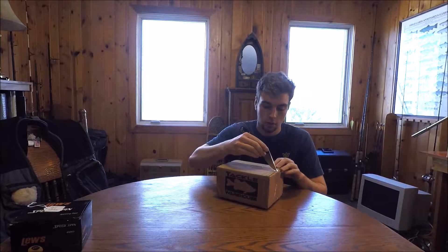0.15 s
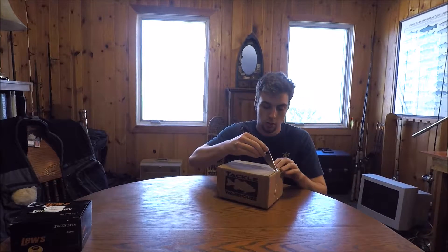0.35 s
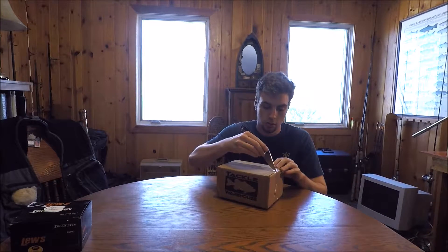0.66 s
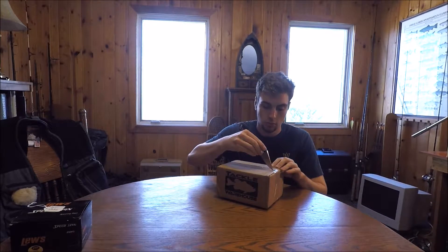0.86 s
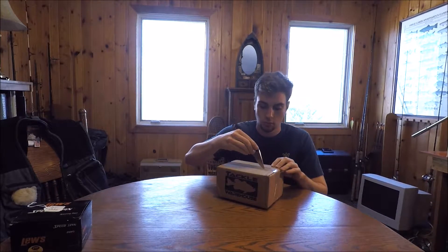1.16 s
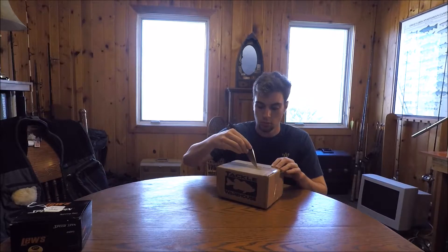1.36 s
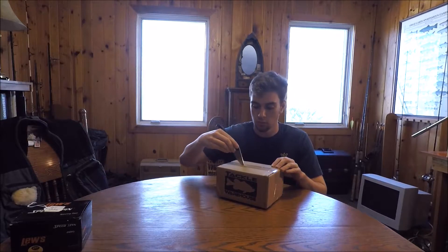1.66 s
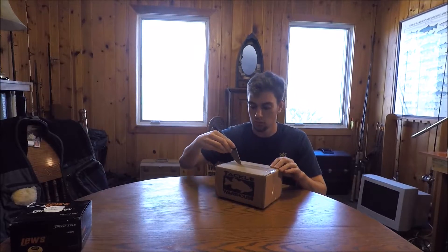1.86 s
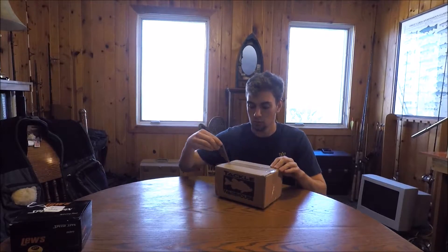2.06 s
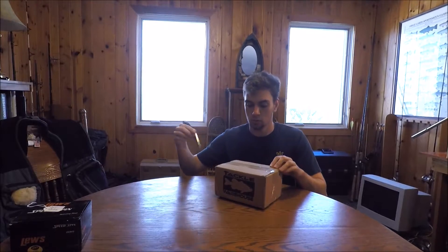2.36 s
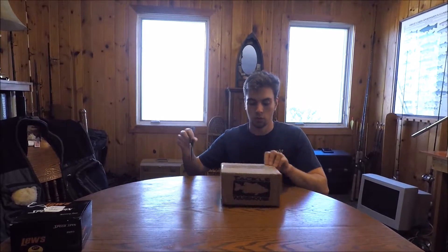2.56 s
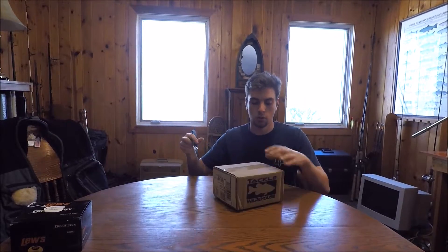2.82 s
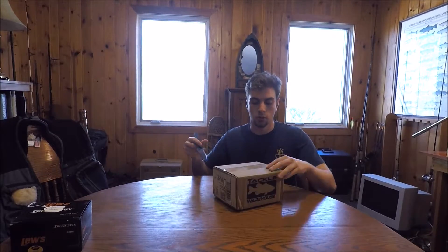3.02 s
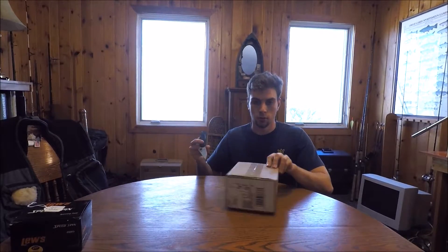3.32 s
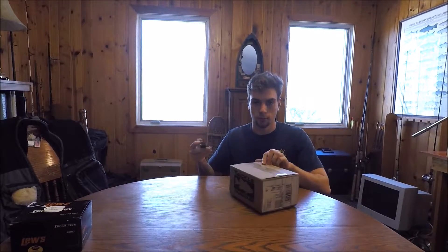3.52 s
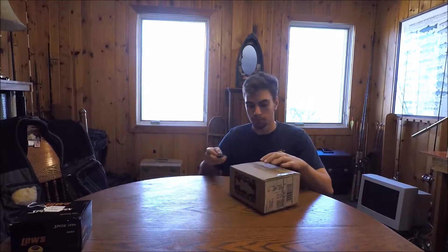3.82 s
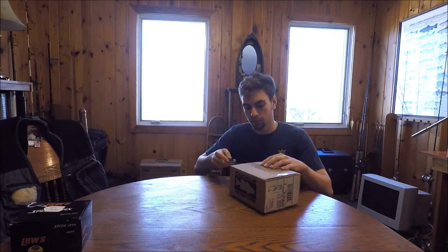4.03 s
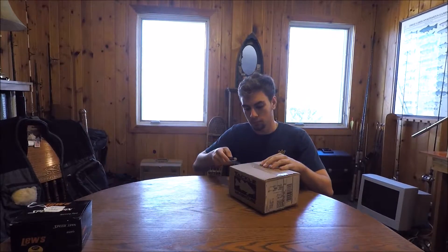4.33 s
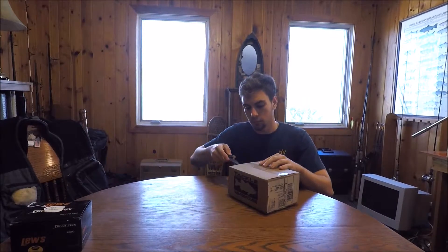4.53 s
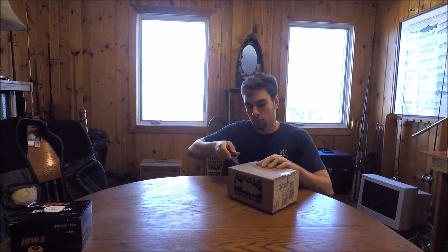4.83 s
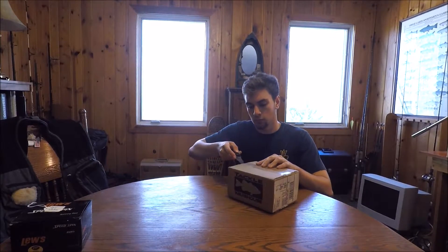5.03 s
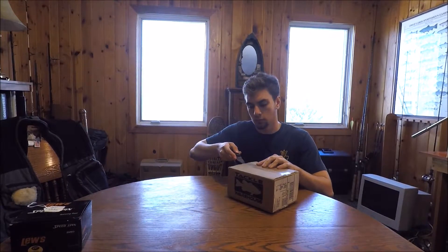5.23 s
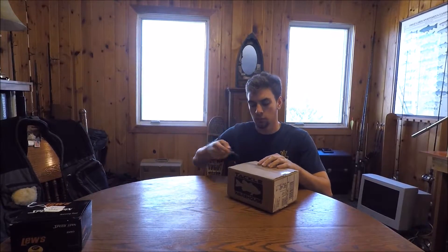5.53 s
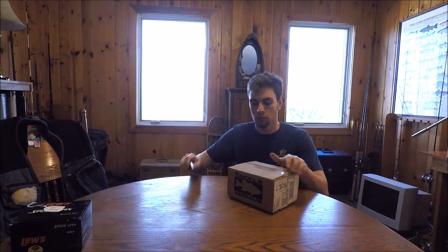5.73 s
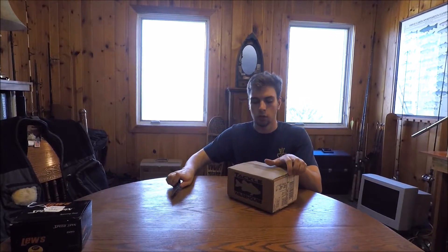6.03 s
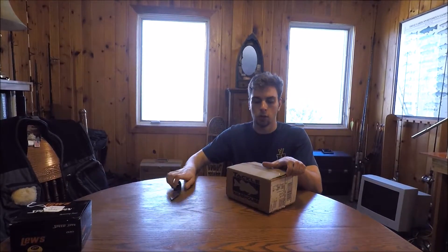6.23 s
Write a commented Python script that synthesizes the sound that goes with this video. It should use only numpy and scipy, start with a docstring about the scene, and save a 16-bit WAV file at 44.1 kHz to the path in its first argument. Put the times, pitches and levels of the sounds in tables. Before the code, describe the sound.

A small panelled room, heard from a microphone resting on a wooden table: soft hiss and a low tremble underneath. Nearly nothing until 0.8 s, when a blade bites into box tape, giving short, uneven, crackling scrapes until about 2.2 s, with dull cardboard knocks and a stronger thump at 2.2. Dry, close, woody creak ticks punctuate this, loudest around 1.9, 2.3 and 2.6 s. The box is shoved at 2.45-2.7 s with a coarse, swelling rasp, then more softly at 3.1-3.65 s, as creaks thin out. Around 4.0-4.3 s come faint hollow taps and a low wobble. Quiet brushes at 4.6 lead to a firm hollow box thump at 5.0, then rough cutting bursts from 5.15 to 5.5 s with small creaks. The knife knocks the table at 6.0, lightly again at 6.16, and lands at 6.27 s in a loud, quick clatter with steel clicks and brief wooden ringing, right at the end.

```python
"""Cutting open a cardboard box

A small knife slits the packing tape of a box on a wooden table, in a small panelled room: rough friction noise.
The box is shoved round and cut again; then the knife is knocked and laid down with a clatter.
Knocks are short rough contacts that sound the box or the table, heard with the echoes of the room.
The table creaks in dry ticks as the arms shift their weight; they reach the microphone on it through its mount.
A low tremble of the table and a quiet room tone lie underneath."""
import sys
import numpy as np
from scipy import signal
from scipy.fft import rfft, irfft, next_fast_len
from scipy.io import wavfile
from scipy.ndimage import uniform_filter1d, map_coordinates

SR = 44100
rng = np.random.default_rng(int(sys.argv[2]) if len(sys.argv) > 2 else 0)


def generate_wav(signal):
    """Clip the signal to [-1, 1] and save it as 16-bit WAV at the path in sys.argv[1]."""
    frames = np.transpose(np.atleast_2d(signal))
    scaled = np.clip(frames, -1, 1) * 32767
    pcm = np.round(scaled).astype(np.int16)
    wavfile.write(sys.argv[1], SR, pcm)


N = 281165  # samples in the scene

# All event levels below are relative: the functions add their own gains.
# Pulls of the blade through the tape and quiet brushes of the hand on the box:
# start t/s, length t/s, force level/dB, hiss over the force level/dB
PULLS_AND_BRUSHES = [(0.833, 0.056, -58.5, -11), (0.882, 0.094, -52.5, 0), (0.997, 0.062, -47.5, -3.5),
                     (1.103, 0.29, -61, 3), (1.245, .2, -52.5, -2), (1.45, 0.1, -48, -5),
                     (1.541, 0.13, -48.5, -3), (1.66, 0.041, -56, 2.5), (1.703, 0.05, -46.5, -5),
                     (1.78, 0.21, -56, -1), (1.97, 0.035, -52.5, -1), (2.015, 0.068, -38.5, -15),
                     (2.109, 0.058, -41.5, -6.5), (4.552, 0.11, -60.5, -14), (4.661, 0.085, -55, 1),
                     (4.726, 0.05, -54, -1.5), (5.15, 0.066, -54, -16), (5.203, 0.077, -48.5, -10),
                     (5.325, 0.088, -43.5, -9.5), (5.419, 0.064, -44.5, -4.5), (5.5, 0.19, -59.5, -13),
                     (5.755, 0.033, -61, -1)]
# The box sliding on the table: start t/s, fastest t/s, stop t/s, rasp level/dB, flex level/dB, hiss level/dB,
# slips per second, panel f/Hz
BOX_SLIDES = [(2.452, 2.675, 2.714, -40.5, -40.5, -45, 1100, 404),
              (3.13, 3.37, 3.653, -48, -49.5, -49, 2800, 363)]
# Blade and hand striking the box: t/s, thump level/dB, tape snap over the thump level/dB, struck panel f/Hz
BOX_STRIKES = [(.826, -49.5, -8, 400), (1.063, -40.5, -19.5, 185), (1.623, -47.5, -29, 220),
               (2.176, -31, -20.5, 210), (3.012, -53, -10, 377), (3.315, -47, -16, 323),
               (3.956, -56.5, -26, 165), (4.976, -47.5, -4.5, 424), (4.984, -30, -17.5, 405),
               (4.991, -37, -13.5, 156), (5.245, -51, -1, 295), (6.205, -46, -21, 263)]
# The knife meeting the table: t/s, thud level/dB, wood level/dB, steel click level/dB
KNIFE_LANDINGS = [(5.989, -30.5, -25, -45), (6.162, -37.5, -41, -70), (6.2737, -20, -20.5, -54),
                  (6.2827, -32, -25, -27.5), (6.307, -31.5, -24, -49), (6.321, -39, -26.5, -58),
                  (6.339, -27.5, -27.5, -42)]
# Light taps as the knife hand settles: t/s, level/dB
HAND_TAPS = [(4.043, -45), (4.192, -49), (4.259, -55.5)]
# Distinct slips of the table joint: t/s, level/dB
DISTINCT_CREAKS = [(1.169, -33), (1.2856, -39), (1.4295, -28), (1.5158, -39), (1.8885, -14.5),
                   (1.9555, -20.5), (2.0107, -24), (2.151, -23), (2.3234, -13), (2.3755, -19.5),
                   (2.4554, -25.5), (2.4917, -27.5), (2.604, -15.5), (2.7097, -24), (2.746, -33),
                   (2.8318, -32), (3.0853, -27.5), (3.198, -25.5), (3.2371, -33), (3.2872, -29.5),
                   (3.768, -48), (4.413, -43.5), (4.5373, -27), (4.6532, -40.5), (5.1785, -35),
                   (5.3166, -27), (5.4477, -28.5), (5.5707, -27.5), (5.699, -38), (5.819, -44.5),
                   (6.1779, -20.5)]
# The table rocking on its legs: t/s, level/dB, f/Hz
TABLE_SWAYS = [(4.071, -32, 23.7)]
# Weight of the arms on the table: t/s, level/dB
ARM_WEIGHT = [(0, -7.5), (.9, -11.5), (1.3, -0.5), (2.6, 0), (3.801, -6), (6.3, 0.5)]

# Low boom of the box panels: f/Hz, level/dB per Hz
PANEL_SPECTRUM = [(60, -23.5), (110, -10), (138, -2), (165, 0.5), (215, -7.5), (275, -3.5), (340, -4),
                  (400, -5.5), (500, -5), (580, -13), (700, -25), (1100, -53)]
# Rasp of the cardboard: f/Hz, level/dB per Hz
BOARD_SPECTRUM = [(350, -31.5), (600, -7), (800, -4), (1000, 0), (1270, -0.5), (1550, -4), (1800, -13),
                  (2100, -26), (3000, -21.5), (6000, -69.5)]
# Hiss and snap of the tape: f/Hz, level/dB per Hz
TAPE_SPECTRUM = [(1200, -17), (2000, 5), (2600, 4), (3400, 7.5), (4200, 0.5), (5000, 2.8), (5800, 4),
                 (7000, -1), (9000, -6.5), (11000, -6), (13000, -13), (15500, -17)]
# Thin top of a fast stroke: f/Hz, level/dB per Hz
ZIP_SPECTRUM = [(5000, -22), (8500, -11), (11000, -1.5), (15500, -17.5)]
# Low thud of the table: f/Hz, level/dB per Hz
THUD_SPECTRUM = [(60, -21), (105, -8.5), (138, 2), (190, -13), (255, 2), (370, -2.5), (480, -2),
                 (620, -10.5), (750, -24), (1200, -61)]
# Knock of the table's wood: f/Hz, level/dB per Hz
WOOD_SPECTRUM = [(350, -20), (600, -7), (750, -4.5), (930, 1.5), (1100, -6), (1380, 7.5), (1600, -6),
                 (1850, -9.5), (2200, -30), (2750, -27), (3800, -37), (5500, -33.5), (8000, -50),
                 (15000, -68)]
# Click of the knife's steel: f/Hz, level/dB per Hz
STEEL_SPECTRUM = [(1000, -38), (1900, 11.5), (2600, 7.5), (3300, -5), (4200, -19), (5400, -21),
                  (7000, -19.2), (9000, -25.2), (10700, -15), (12500, -37), (15500, -36.5)]
# Soft hollow tap: f/Hz, level/dB per Hz
TAP_SPECTRUM = [(90, 0.5), (250, 0.5), (420, -29), (530, 0), (730, -14.5), (950, -3), (1180, 3.5),
                (1450, -2.5), (1800, -22), (4000, -29), (5200, -23), (7000, -37)]
# Ringing of the table top: f/Hz, level/dB, time to fall 60 dB t/s
TABLE_RINGING = [(137.5, -15, 0.33), (259, 1.5, .22), (320, 0, 0.097), (472, -11, 0.14), (617, 3.5, 0.46),
                 (685.4, -4, 0.27), (800, 2, 0.44), (918, -26, 0.29), (1050, 5, 0.3), (1263, -6, 0.21),
                 (1346, -21, 0.39), (1385, -9.5, 0.21), (1634, -16, 0.22), (1590, -9.5, 0.39),
                 (1750, -20, .24), (2032, -28, 0.7), (2540, -24, .3)]
# Resonances of the microphone mount: f/Hz, width f/Hz, level/dB
MOUNT_RESONANCES = [(477, 64, -5), (523, 18.3, -1), (750, 91, -5.5), (967, 53, 4), (1182, 180, 1.5),
                    (1460, 180, -1), (1706, 52, -5.5), (1822, 104, -1.5), (2460, 140, -24.5),
                    (2869, 320, -26), (3270, 113, -13), (3600, 78, -14), (4310, 84, -18), (4680, 116, -17),
                    (5270, 150, -21), (6510, 150, -27)]
# Trembling of the table: f/Hz, level/dB per Hz
TREMBLE_SPECTRUM = [(10, -20.5), (26, 9), (48, -4.5), (80, -11.5), (130, -8.5), (300, -46.5)]
# Background of the room: f/Hz, level/dB per Hz
ROOM_TONE_SPECTRUM = [(12, -39), (20, -2.5), (59, -5), (76, -16.5), (219, -20.5), (259, -15), (289, -26),
                      (315, -21.5), (581, -30), (1920, -32.5), (2210, -35.5), (3170, -35.5), (5850, -37.5),
                      (6910, -41.5), (15500, -47.5)]
# Fading of the room's echoes: f/Hz, time to fall 60 dB t/s
ROOM_DECAY = [(100, 0.3), (260, 0.19), (700, 0.3), (1800, 0.3), (5000, 0.34), (14000, 0.19)]
GRID = np.fft.rfftfreq(8192, 1 / SR)  # f/Hz at which the bodies are described

CUT_ATTACK_S, CUT_RELEASE_S = 0.014, 0.0076  # the blade bites; its drag dies away
HAND_WAVER_DB, HAND_WAVER_PER_S = 1.7, 20  # unsteady pressure of the hand
TURNED_S = 4  # from here on the blade works on the second seam
SLIDE_ATTACK_S, SLIDE_RELEASE_S = 0.033, 0.015  # the box breaks free; it comes to rest
SWELL_S = 0.13  # time constant with which the box gathers speed and loses it
PUSH_LEAD_S = 0.091  # the push that flexes the panels comes before the speed
FLEX_POWER, RASP_POWER = 0.82, 0.56  # flex grows as this power of the push, rasp of the speed
BOARD_UNDER_THUMP_DB = -7
FAINT_CREAK_DB, FAINT_CREAK_SPREAD_DB = -48, 3  # relative level; spread to either side
FAINT_FIRST_S, FAINT_LAST_S = 1.1, 3.6  # during the first cut and the turning of the box
TOP_HZ = 15480  # band limit


def cutting():
    """The knife slits one seam, and another after the box is turned, with quiet brushes of the hand."""
    first_pulls = [row for row in PULLS_AND_BRUSHES if row[0] < TURNED_S]
    second_pulls = [row for row in PULLS_AND_BRUSHES if row[0] > TURNED_S]
    # each seam drives a different panel
    first = stroke(pulls(first_pulls), rate=400, spread_db=-0.5, surge_db=1.5, panel_hz=213, lift_db=2.0,
                   panel_db=-3.0, board_db=-0.9, hiss_db=-6.05, zip_db=-3)
    second = stroke(pulls(second_pulls), rate=500, spread_db=3.0, surge_db=3.5, panel_hz=141, lift_db=4.5,
                    panel_db=-4.0, board_db=0.0, hiss_db=-1.3, zip_db=-20)
    return first + second


def pulls(rows):
    """Flex, rasp and hiss of each pull or brush: it bites, holds under a wavering hand and lets go."""
    force, hiss = np.zeros(N), np.zeros(N)
    for start, length, force_db, hiss_db in rows:
        envelope = held(start, start + length, CUT_ATTACK_S, CUT_RELEASE_S)
        force = np.maximum(force, amp(force_db) * envelope)
        hiss = np.maximum(hiss, amp(force_db + hiss_db) * envelope)
    hand = amp(HAND_WAVER_DB * wobble(HAND_WAVER_PER_S))
    return force * hand, force * hand, hiss * hand


def sliding():
    """The box is pushed round in two shoves; each gathers speed and slows again, hissing most when fastest."""
    t, track = np.arange(N) / SR, np.zeros(N)
    for start, fastest, stop, rasp_db, flex_db, hiss_db, rate, panel_hz in BOX_SLIDES:
        speed = np.exp(-np.abs(t - fastest) / SWELL_S)
        push = np.exp(-np.abs(t + PUSH_LEAD_S - fastest) / SWELL_S)
        moving = held(start, stop, SLIDE_ATTACK_S, SLIDE_RELEASE_S)
        drive = moving * np.array([push ** FLEX_POWER, speed ** RASP_POWER, speed])
        track += stroke(drive, rate, spread_db=2.5, surge_db=2.6, panel_hz=panel_hz, lift_db=6.5,
                        panel_db=flex_db, board_db=rasp_db, hiss_db=hiss_db, zip_db=-2.8)
    return track


def stroke(drive, rate, spread_db, surge_db, panel_hz, lift_db, panel_db, board_db, hiss_db, zip_db):
    """Friction flexes the box panels, rasps the board and hisses on the surface; drive holds the three gains."""
    flex, rasp, hiss = drive
    surges = unit(amp(surge_db * wobble(45)))  # fibres resist, then give way in bunches
    catches = slips(rate, spread_db) * surges

    def play(force, body):
        return signal.oaconvolve(force, radiated(body, direct_db=-1.5))[:N]

    boom = amp(panel_db) * play(flex * catches, panel(panel_hz, lift_db))
    rasping = amp(board_db) * play(rasp * catches, impulse(BOARD_SPECTRUM))
    fine = unit(catches + 0.83 * surges * rng.standard_normal(N))
    hissing = amp(hiss_db) * play(hiss * fine, impulse(TAPE_SPECTRUM))
    # the strongest part of the hiss adds a thin zip on top
    zip_force = hiss * (hiss / hiss.max()) ** 1.6 * surges * slips(rate * 2, spread_db)
    zipping = amp(hiss_db + zip_db) * play(zip_force, impulse(ZIP_SPECTRUM))
    return boom + rasping + hissing + zipping


def slips(rate, spread_db):
    """Stick-slip: tiny impulses of uneven size at random moments, at a steady mean power."""
    happens = rng.random(N) < rate / SR
    train = happens * rng.standard_normal(N) * amp(spread_db * rng.standard_normal(N))
    local_power = np.abs(uniform_filter1d(train ** 2, size=1500))
    return train / np.sqrt(local_power + 1e-6)


def box_knocks(gain_db):
    """The blade punches through tape or drops off an edge: panel, board and tape all sound."""
    track = np.zeros(N)
    for s, thump_db, snap_db, panel_hz in BOX_STRIKES:
        thump = blow(panel(panel_hz, lift_db=10.5), contact_s=0.0039, crisp=1.0, direct_db=-2.5)
        board = blow(impulse(BOARD_SPECTRUM), contact_s=0.01154, crisp=1.7, direct_db=-2.5)
        snap = blow(impulse(TAPE_SPECTRUM), contact_s=0.02, crisp=0.54, direct_db=-3)
        add(track, s, amp(thump_db) * thump)
        add(track, s, amp(thump_db + BOARD_UNDER_THUMP_DB) * board)
        add(track, s, amp(thump_db + snap_db) * snap)
    return amp(gain_db) * track


def table_knocks(gain_db, ring_db):
    """The knife thuds on the table top, which rings on in fading tones; its steel clicks."""
    track = np.zeros(N)
    for s, thud_db, wood_db, steel_db in KNIFE_LANDINGS:
        thud = blow(impulse(THUD_SPECTRUM), contact_s=0.0025, crisp=0.8, direct_db=-8.5)
        wood = blow(impulse(WOOD_SPECTRUM), contact_s=0.00157, crisp=0.38, direct_db=-5.5)
        steel = blow(impulse(STEEL_SPECTRUM), contact_s=0.005, crisp=0.21, direct_db=2.0)
        add(track, s, amp(thud_db) * thud)
        add(track, s, amp(wood_db) * wood)
        add(track, s, amp(steel_db) * steel)
        add(track, s, amp(wood_db + ring_db) * table_ring())
    return amp(gain_db) * track


def table_ring():
    """The table top's resonances, each dying at its own pace, a little different at every blow; energy 1."""
    t = np.arange(SR // 2) / SR
    ring = np.zeros(len(t))
    for hz, db, t60 in TABLE_RINGING:
        fade = amp(db + rng.normal(0, 2.3) - 60 * t / t60)
        ring += fade * np.sin(2 * np.pi * (hz * t + rng.random()))
    ring *= 1 - np.exp(-t / 0.0024)  # soft start
    return ring / np.linalg.norm(ring)


def taps(gain_db):
    """Soft hollow taps between the cuts: a short contact sounds a hollow body."""
    track = np.zeros(N)
    for s, db in HAND_TAPS:
        tap = blow(impulse(TAP_SPECTRUM), contact_s=0.0068, crisp=1.0, direct_db=-3)
        add(track, s, amp(db + gain_db) * tap)
    return track


def table_creaks(tick_db, rebound_db, rebound_s, shake_db):
    """Every slip rings the mount alike, without room; the mount then shakes and rebounds once."""
    tick = resonator(MOUNT_RESONANCES)
    tick /= np.abs(tick).max()
    dull = filtered(tick, lambda hz: 1 / (1 + 1j * hz / 1800))  # less treble
    track = np.zeros(N)
    for s, db in DISTINCT_CREAKS + faint_creaks(count=8):
        add(track, s + 0.00056, amp(db + tick_db) * tick)
        add(track, s + rebound_s, amp(db + rebound_db) * dull)
        add(track, s + 0.0011, amp(db + shake_db) * sway(hz=44.2, t60=0.19))
    for s, db, hz in TABLE_SWAYS:
        add(track, s, amp(db) * sway(hz, t60=0.53))
    return track


def faint_creaks(count):
    """Times (s) and levels (dB) of small slips at random moments during the first cut and the turning."""
    creaks = []
    for when, size in rng.random((count, 2)):
        s = FAINT_FIRST_S + (FAINT_LAST_S - FAINT_FIRST_S) * when
        db = FAINT_CREAK_DB + FAINT_CREAK_SPREAD_DB * (2 * size - 1)
        creaks.append((s, db))
    return creaks


def sway(hz, t60):
    """A slow dying oscillation; t60 is the time in seconds to fall 60 dB."""
    t = np.arange(SR // 2) / SR
    return -np.sin(2 * np.pi * hz * t) * amp(-60 * t / t60)


def handling_rumble(db):
    """The table trembles while the arms work on it: low noise that follows their weight."""
    effort_db = np.interp(np.arange(N) / SR, *np.transpose(ARM_WEIGHT))
    tremble = filtered(rng.standard_normal(N), lambda hz: amp(along(TREMBLE_SPECTRUM, hz)))
    return amp(db + effort_db) * unit(tremble)


def room_tone(db):
    """Low building rumble under an even hiss: steady filtered noise."""
    tone = filtered(rng.standard_normal(N), lambda hz: amp(along(ROOM_TONE_SPECTRUM, hz)))
    return amp(db) * unit(tone)


def blow(body, contact_s, crisp, direct_db):
    """A first strike and a short rough contact sound a body in the room; energy 1."""
    t = np.arange(SR // 20) / SR
    contact = rng.standard_normal(len(t)) * np.exp(-t / contact_s)
    contact[0] += crisp * np.linalg.norm(contact)
    sound = signal.fftconvolve(contact, radiated(body, direct_db))
    return sound / np.linalg.norm(sound)


def radiated(body, direct_db):
    """A body's response as it crosses the room: direct sound, then dense wall echoes; energy 1."""
    hz, t, noise = signal.stft(rng.standard_normal(SR // 2), SR, nperseg=256)
    fade = amp(-60 * t / along(ROOM_DECAY, hz)[:, None])  # each pitch dies at its own pace
    path = signal.istft(noise * fade, SR, nperseg=256)[1]
    path /= np.linalg.norm(path)
    path[0] += amp(direct_db)
    response = signal.fftconvolve(path, body)
    return response / np.linalg.norm(response)


def panel(hz, lift_db, width=0.22):
    """The low boom of the box, lifted around the pitch of the panel that is driven."""
    lift = lift_db / (1 + ((GRID - hz) / (width * hz)) ** 2)
    return causal(amp(along(PANEL_SPECTRUM, GRID) + lift))


def impulse(spectrum):
    """Response of a body with the given spectrum (f/Hz, level/dB)."""
    return causal(amp(along(spectrum, GRID)))


def resonator(modes):
    """Response of a body with the given resonances (f/Hz, width f/Hz, level/dB)."""
    total = 0
    for k, (hz, width, db) in enumerate(modes):
        peak = 1j * GRID * width / (hz * hz - GRID ** 2 + 1j * GRID * width)
        total = total + (-1) ** k * amp(db) * peak  # neighbours have opposite signs
    return causal(total)


def causal(gain):
    """The most compact causal response with these gains on the frequency grid; energy 1."""
    cepstrum = irfft(np.log(np.abs(gain) + 1e-6))
    half = len(cepstrum) // 2
    # folding the cepstrum forward in time gives minimum phase
    cepstrum[1:half] *= 2
    cepstrum[half + 1:] = 0
    response = irfft(np.exp(rfft(cepstrum)))
    return response / np.linalg.norm(response)


def held(start, stop, attack_s, release_s):
    """An envelope that rises at start, holds until stop and dies away."""
    t = np.arange(N) / SR
    rise = np.clip((t - start) / attack_s, 0, 1)
    return rise * np.exp(-np.maximum(t - stop, 0) / release_s)


def wobble(rate):
    """A smooth random curve through rate random points a second."""
    knots = rng.standard_normal(int(N * rate / SR) + 4)
    return map_coordinates(knots, [np.arange(N) * rate / SR])


def filtered(x, response):
    """Shape the spectrum of x by a response that depends on frequency."""
    m = next_fast_len(len(x) + SR // 4)
    return irfft(rfft(x, m) * response(np.fft.rfftfreq(m, 1 / SR)), m)[:len(x)]


def along(points, hz):
    """Read (f/Hz, value) points on a log frequency axis."""
    f, v = np.transpose(points)
    return np.interp(np.log(hz + 1), np.log(f + 1), v)


def add(track, s, sound):
    """Mix a sound into the track at time s, in seconds."""
    part = track[round(s * SR):][:len(sound)]
    part += sound[:len(part)]


def amp(db):
    """Decibels to gain."""
    return 10 ** (np.asarray(db) / 20)


def unit(x):
    """Scale to rms 1."""
    return x / np.sqrt(np.mean(x ** 2) + 1e-20)


def scene():
    """Cuts, slides, knocks and creaks over the quiet room."""
    knocks = box_knocks(gain_db=33) + table_knocks(gain_db=29.0, ring_db=-7.5) + taps(gain_db=30.5)
    creaks = table_creaks(tick_db=3.5, rebound_db=-11.0, rebound_s=0.021, shake_db=-14.0)
    background = handling_rumble(db=-50.0) + room_tone(db=-56.5)
    return (cutting() + sliding() + knocks + creaks + background)[None]  # one channel


def record(dry):
    """Nothing is kept above the band limit."""
    return np.array([filtered(channel, lambda hz: hz < TOP_HZ) for channel in dry])


dry = scene()
out = record(dry)
generate_wav(out)
```